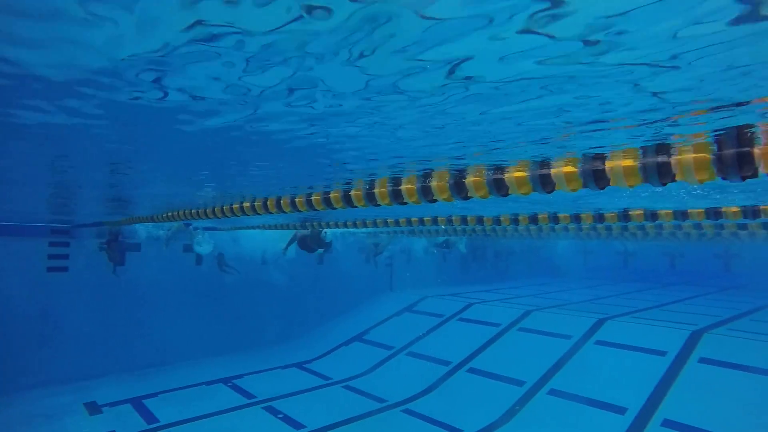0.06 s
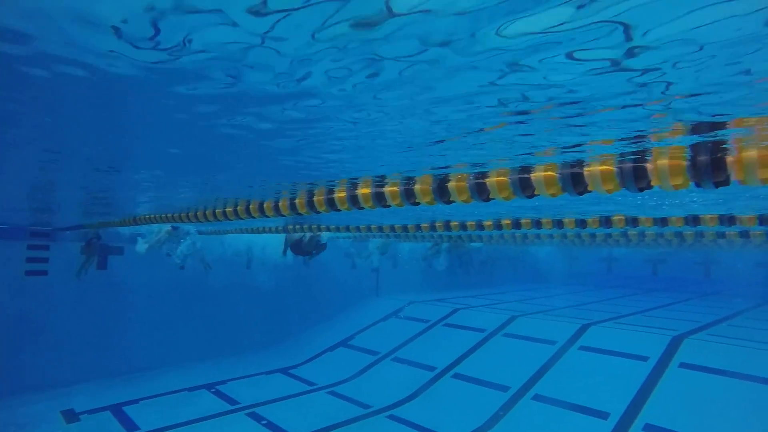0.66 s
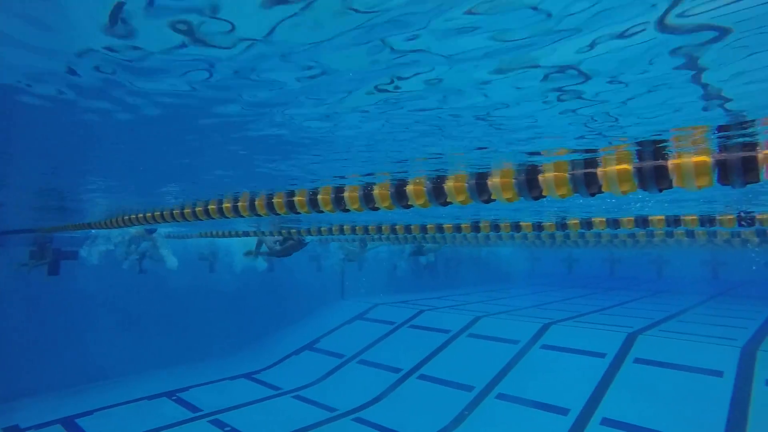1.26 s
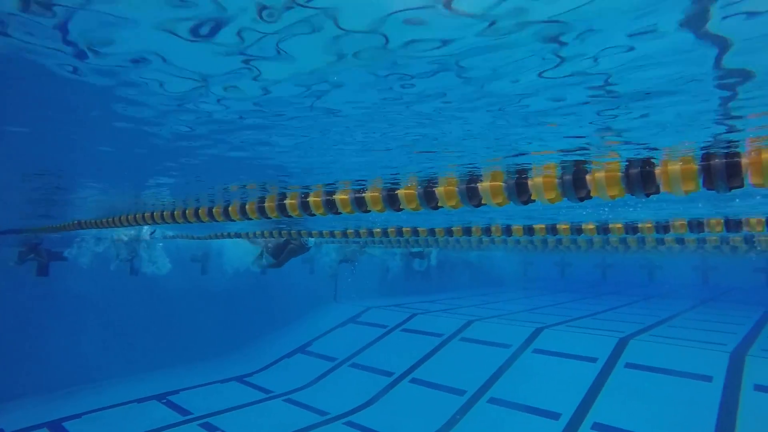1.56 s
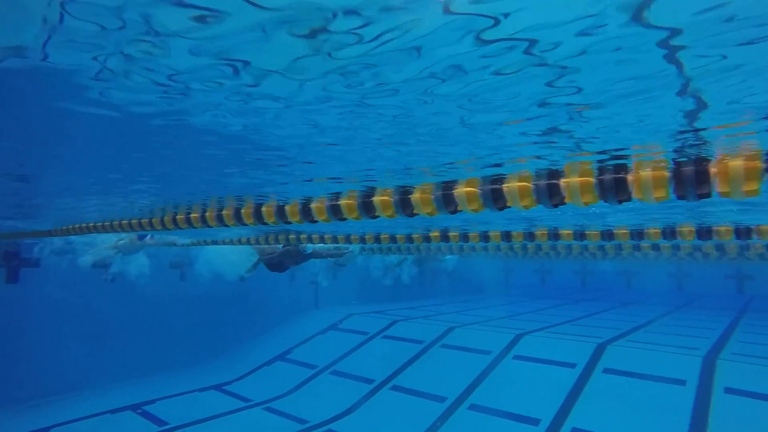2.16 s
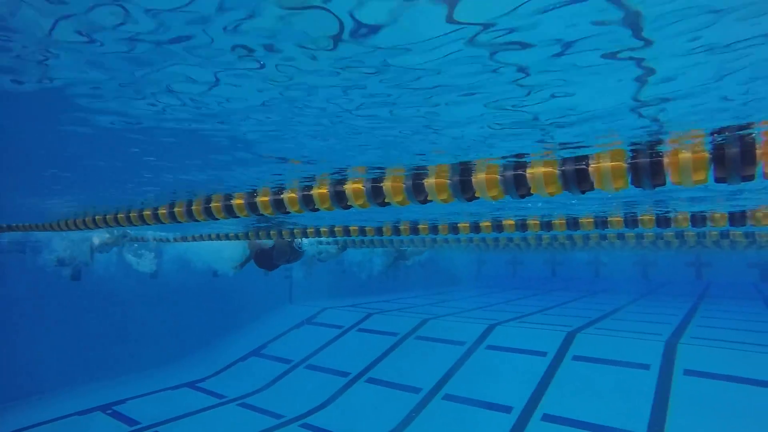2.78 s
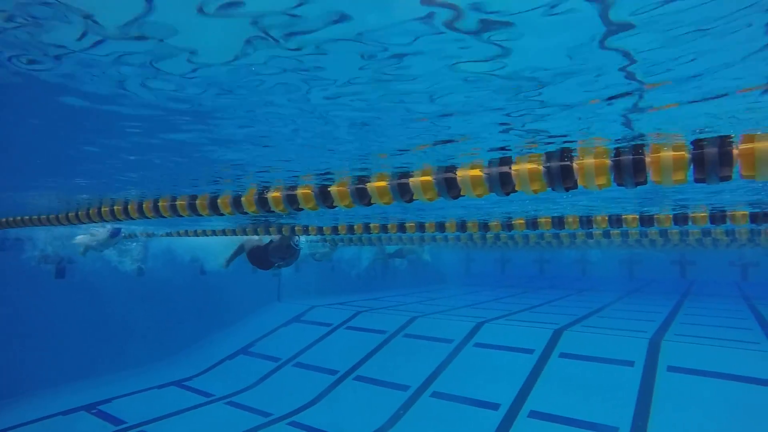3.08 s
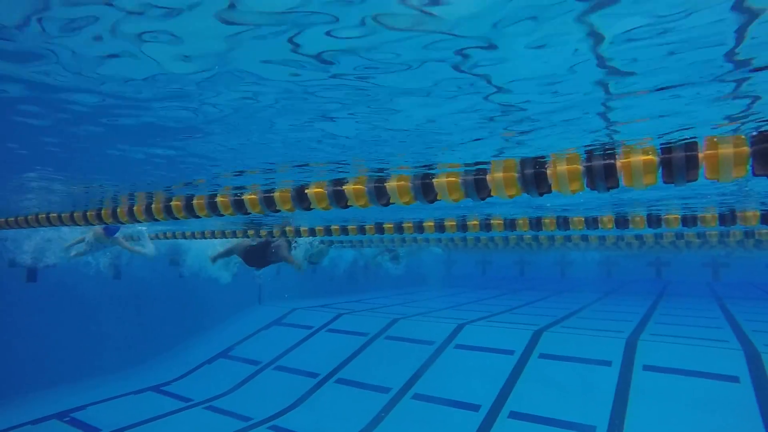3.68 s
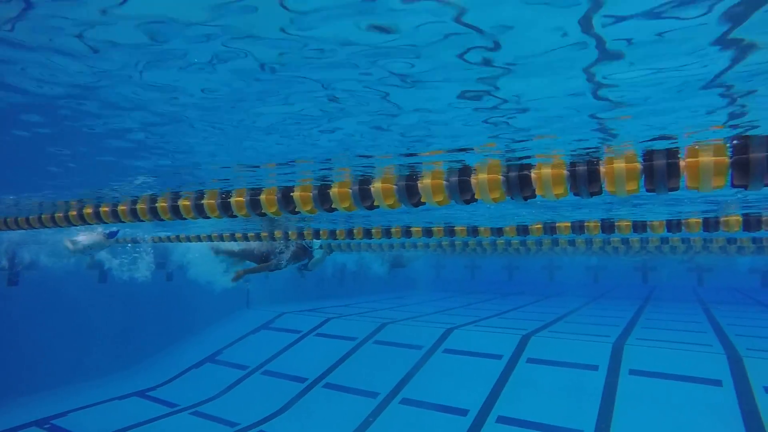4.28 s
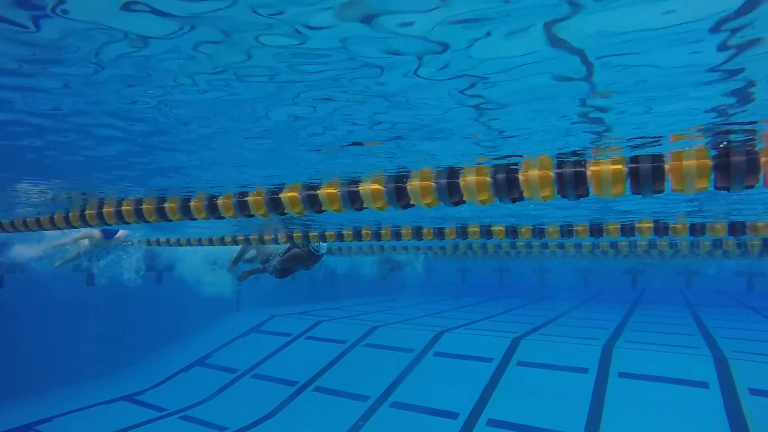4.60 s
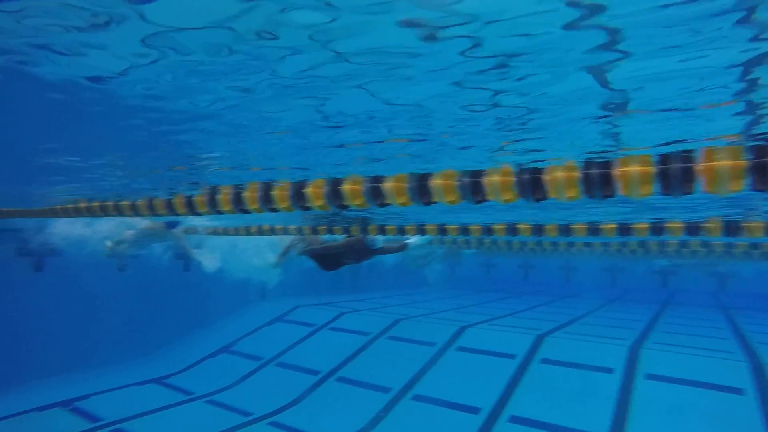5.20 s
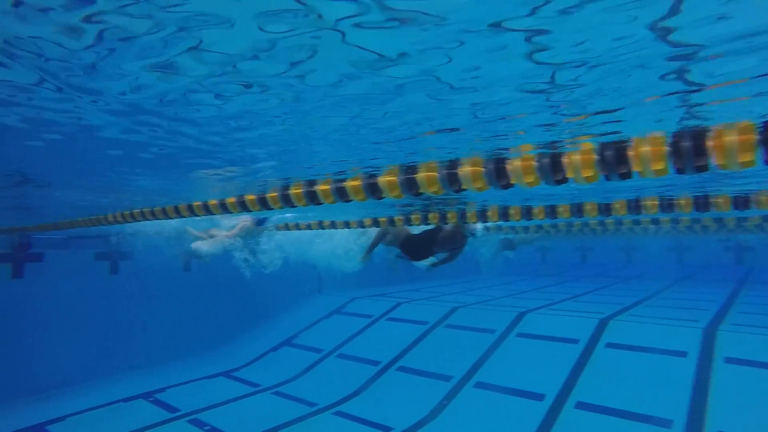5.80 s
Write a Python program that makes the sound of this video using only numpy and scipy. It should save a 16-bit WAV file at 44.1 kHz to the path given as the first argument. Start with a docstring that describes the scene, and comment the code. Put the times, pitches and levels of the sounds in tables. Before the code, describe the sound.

Swimmers pass, heard from under water: deep rumbling, hollow thuds and surges of churning, with plinking bubbles and faint fizz.

```python
"""A dull thud over a deep rumble, then churning, plinks and fizz: swimmers pass, heard under water in a pool.
Hands and feet drive air under the surface, where each pocket rings as a spring of gas loaded by water:
big ones thud, small ones plink, and the foam fizzes. Moving water rocks a submerged camera, making the
rumble; the resonances of its sealed housing muffle and colour the rumble and the clouds of bubbles."""
import sys
import numpy as np
from scipy import signal
from scipy.io import wavfile
from scipy.ndimage import uniform_filter1d, minimum_filter1d

SR = 44100
rng = np.random.default_rng(int(sys.argv[2]) if len(sys.argv) > 2 else 0)


def dump_mix(stems):
    """Bounce the given channels to the path in sys.argv[1] as a 16-bit WAV at rate SR."""
    frames = np.atleast_2d(stems).T  # one column per channel
    limited = np.clip(frames, -1, 1)  # hard clip at full scale
    pcm = np.round(limited * 32767).astype(np.int16)
    wavfile.write(sys.argv[1], SR, pcm)


N = 266805
TIME = np.arange(N) / SR


def amp(db):
    """Amplitude ratio: tenfold for every 20 dB."""
    return 10 ** (np.asarray(db) / 20)


def unit(x):
    """Normalisation to an rms of one."""
    return x / np.sqrt(np.mean(x ** 2) + 1e-20)


def envelope(table):
    """Amplitude envelope, interpolated linearly in decibels."""
    times, db = np.transpose(table)
    return amp(np.interp(TIME, times, db))


def housed(x, colour, size=32768):
    """Minimum-phase filtering: the housing's resonance peaks on a smooth spectrum, at unit rms."""
    # housing resonances: (frequency [Hz], bandwidth [Hz], lift [dB])
    modes = [(173.3, 19.6, 7.5), (214, 24, 6), (281, 54, 2.5), (445, 33, 9.5), (498, 33, 3.5), (830, 16, 2),
             (1084, 190, 7), (1470, 135, 6.5), (2863, 610, 8.5), (5470, 910, 12.5), (7050, 240, 3),
             (10420, 370, 5), (13600, 1300, 7)]
    hz = np.fft.rfftfreq(size, 1 / SR)
    points_hz, points_db = np.transpose(colour)
    db = np.interp(np.log(hz + 1), np.log(points_hz), points_db)
    db -= 40 * np.log2(np.maximum(hz / points_hz[-1], 1))  # roll-off above the last point
    db += sum(lift / (1 + (2 * (hz - centre) / width) ** 2) for centre, width, lift in modes)
    log_gain = np.log(amp(np.maximum(db, -100)))
    mirrored = np.concatenate([log_gain, log_gain[-2:0:-1]])
    response = np.exp(np.conj(signal.hilbert(mirrored)))
    taps = np.fft.ifft(response).real[:size // 4]
    wrapped = np.concatenate([x[-len(taps) + 1:], x])
    return unit(signal.fftconvolve(wrapped, taps, "valid"))


def steadied(x, span_s):
    """Division by the running rms evens out the power; faster flutter stays."""
    window = signal.windows.hann(int(span_s * SR) | 1)
    power = signal.fftconvolve(np.pad(x ** 2, SR, "reflect"), window, "same")[SR:-SR]
    return unit(x / np.sqrt(abs(power) + 1e-12))


def pool(x, wet_db, t60_s):
    """Reverberation: sparse reflections off surface, floor and walls decay exponentially."""
    t = np.arange(SR // 4) / SR
    taps = rng.standard_normal(len(t)) * amp(-60 * t / t60_s)
    taps *= (rng.random(len(t)) < 2500 / SR) * (t > .003)  # 2500 echoes a second, after 3 ms
    return x + amp(wet_db) * signal.fftconvolve(x, taps / np.linalg.norm(taps))[:N]


def bubble(hz, swell, rise):
    """Damped volume oscillation: an air pocket swells and dies, its pitch rising as it nears the surface."""
    peak_cycles = swell * (hz / 1000) ** (1 / 4)  # small bubbles ring for more cycles
    cycles = np.arange(int(10 * peak_cycles * SR / hz) + 2) * hz / SR
    age = cycles / peak_cycles
    phase = cycles * (1 + rise * (age - 2)) + rng.random()
    return age * np.exp(1 - age) * np.sin(2 * np.pi * phase)


def ring(rows, swell, rise):
    """Superposition of one bubble for each row of (time [s], level [dB], pitch [Hz])."""
    mix = np.zeros(N)
    for start, db, hz in rows:
        sound = amp(db) * bubble(hz, swell, rise)
        part = mix[round(start * SR):][:len(sound)]
        part += sound[:len(part)]
    return mix


def swarm(colour, per_s, spread_db, swell, far_db, span_s):
    """Incoherent sum at unit rms: near bubbles ring at random, and far ones merge into noise."""
    when, chance, place = rng.random((int(per_s * N / SR), 3)).T
    low_hz, high_hz = colour[1][0], colour[-2][0]
    hz = low_hz * (high_hz / low_hz) ** place
    size_db = spread_db * np.minimum(-np.log(1 - chance), 4)
    even_db = 15 * np.log10(hz)  # evens out the spectrum before it is coloured
    rings = ring(zip(when * N / SR, size_db + even_db, hz), swell, rise=0.016)
    near = pool(rings, wet_db=-6.5, t60_s=0.038)
    far = housed(rng.standard_normal(N), colour)
    return steadied(housed(near, colour) + amp(far_db) * far, span_s)


def rumble():
    """Forced vibration: the water's slow push and small waves rock the camera."""
    # push of the water: (time [s], relative level [dB])
    push = [(0.0, -27.5), (0.94, -15), (1.06, -27.5), (1.11, -14), (1.2, -18), (1.25, -28), (1.36, -15),
            (1.48, -23.5), (1.6, -14.5), (1.85, -19.5), (2.71, -16), (2.78, -13), (2.96, -29), (3.02, -18),
            (3.74, -15.5), (3.77, -22.5), (4.35, -15), (4.38, -19.5), (5.06, -15), (5.09, -23.5),
            (5.34, -22), (5.37, -14.5), (5.64, -19.5), (6.05, -13)]
    # rumble spectrum: (frequency [Hz], relative level [dB])
    colour = [(10, -32), (20, -25.5), (28, -17), (36, -6.5), (42, 1), (51, -5.5), (66, -8.5), (85, -18.5),
              (130, -35)]
    rock_per_s, rock_db = 5.5, 1.5
    waves = np.interp(TIME * rock_per_s, np.arange(200), rng.uniform(-1, 1, size=200))
    vibration = steadied(housed(rng.standard_normal(N), colour), span_s=0.15)
    return amp(-0.28) * envelope(push) * amp(rock_db * unit(waves)) * vibration


def wake(splash, foam):
    """Small bubbles resonate high: clouds of them plink and fizz, louder with foam and with each splash."""
    # spectrum of small bubbles: (frequency [Hz], relative level [dB])
    small_colour = [(500, -23), (780, 4), (1000, -3), (1280, -4.5), (1800, -3), (2200, -13.5), (3000, -39)]
    # spectrum of tiny bubbles: (frequency [Hz], relative level [dB])
    tiny_colour = [(1600, -24.5), (2300, -2.5), (3200, -1), (3900, -4.5), (4300, -11), (4900, -16),
                   (6400, -14), (8200, -17.5), (9400, -22), (11500, -25), (15000, -26)]
    bubbling = np.hypot(amp(-36) * unit(foam) ** 0.89, amp(-8) * splash)
    fizz = np.hypot(amp(1) * foam, amp(-18) * splash)
    small = swarm(small_colour, per_s=240, spread_db=2.0, swell=2.33, far_db=-0.5, span_s=.4)
    tiny = swarm(tiny_colour, per_s=900, spread_db=4.5, swell=2.43, far_db=2.5, span_s=0.33)
    return bubbling * small + fizz * tiny


def strays(foam, per_s, low_hz, high_hz, level_db, spread_db):
    """Rows for faint random bubbles: smaller ones radiate less, and all grow louder with the foam."""
    db_per_octave = -5.5
    when, size, place = rng.random((int(per_s * N / SR), 3)).T
    hz = low_hz * (high_hz / low_hz) ** place
    foam_db = 20 * np.log10(unit(foam)[(when * N).astype(int)])
    db = level_db + foam_db + spread_db * (size - .5) + db_per_octave * np.log2(hz / low_hz)
    return list(zip(when * N / SR, db, hz))


def snaps(foam):
    """Heavily damped transients: bursting bubbles snap over the foam's faint crackle."""
    # bursting bubbles: (time [s], relative level [dB], pitch [Hz])
    bursts = [(.7665, -28, 4450), (1.592, -38, 4400), (2.433, -26, 1800), (2.465, -23, 1680),
              (2.476, -41, 10200), (2.653, -30.5, 4930), (2.873, -26.5, 3800), (2.712, -32, 3800),
              (2.79, -32.5, 4170), (3.092, -35, 7100), (4.566, -29, 3900), (4.745, -42, 5470),
              (4.891, -37, 7080), (5.021, -39, 9930), (5.159, -28.5, 5600), (5.303, -29, 5530),
              (5.371, -34, 6530), (5.433, -42, 12900)]
    crackle = strays(foam, per_s=5, low_hz=5200, high_hz=13000, level_db=-44.5, spread_db=7.5)
    return amp(2.4) * pool(ring([*bursts, *crackle], swell=0.86, rise=.005), wet_db=-4.5, t60_s=0.026)


def plinks(foam):
    """Free oscillation: single bubbles ring as they pinch off, clear ones among fainter strays."""
    # nearby bubbles: (time [s], relative level [dB], pitch [Hz])
    clear = [(.323, -29.5, 907), (.382, -20.5, 540), (.429, -27, 1110), (.490, -23, 1460), (.500, -26, 855),
             (.637, -27, 1140), (.787, -18.5, 733), (.793, -29, 3000), (.858, -26, 1560),
             (1.043, -26, 1180), (1.392, -25.5, 1410), (1.630, -22.5, 1090), (1.667, -21, 1580),
             (1.967, -21, 1110), (2.067, -17, 800), (2.103, -21, 1110), (2.249, -26, 1180),
             (2.408, -28, 1970), (2.432, -17, 3520), (2.434, -19, 840), (2.464, -25, 3100),
             (2.466, -13, 1080), (2.606, -18, 1100), (2.655, -21.5, 736), (2.860, -15, 527),
             (3.391, -20.5, 940), (3.436, -23, 1150), (3.638, -25, 2950), (3.718, -20, 907),
             (4.114, -22.5, 1130), (4.565, -17.5, 1760), (4.609, -11, 1360), (4.739, -25, 1100),
             (4.856, -16.5, 1100), (4.904, -22, 2960), (4.964, -21, 1170), (4.976, -24, 1840),
             (4.980, -17, 520), (4.992, -22.5, 770), (5.008, -18.5, 1055), (5.152, -20.5, 1130),
             (5.218, -20.5, 835), (5.302, -18, 2950), (5.313, -20, 1190), (5.329, -24, 1580),
             (5.527, -20, 1200), (5.556, -23, 810), (5.992, -20, 1145)]
    faint = strays(foam, per_s=3.3, low_hz=940, high_hz=1580, level_db=-24.5, spread_db=5.5)
    return amp(-1.3) * pool(ring([*clear, *faint], swell=1.82, rise=0.007), wet_db=-7.0, t60_s=0.077)


def stroke_envelopes():
    """Incoherent sources add in power: each near stroke swells, holds and decays exponentially."""
    # kicks and arm pulls: (time [s], duration [s], churn level [dB], glug level [dB], splash level [dB])
    kicks = [(0.01, 0.03, -25, -34, -33), (0.362, 0.011, -27, -33, -39), (0.436, 0.075, -17.5, -30, -53),
             (0.761, 0.043, -15, -17, -30), (0.94, .06, -13, -28, -48), (1.231, .05, -15.5, -32, -36),
             (1.352, 0.023, -13, -21, -29.5), (1.706, 0.059, -15, -17.5, -28.5),
             (2.033, .07, -20, -32, -33.5), (2.445, 0.057, -14.5, -23, -32), (2.853, 0.064, -18, -26, -27),
             (2.986, 0.11, -14.5, -23, -31), (3.25, 0.12, -37, -30, -34), (3.617, 0.049, -17, -28.5, -29),
             (3.714, 0.095, -16, -24, -32), (3.896, 0.055, -17.5, -25, -35), (4.14, .03, -21.5, -46, -38),
             (4.432, 0.064, -19, -29.5, -31.5), (4.99, 0.036, -31, -26, -28.5),
             (5.025, 0.024, -15, -14, -28), (5.25, 0.12, -19, -21.5, -32.5),
             (5.419, 0.083, -25, -25.5, -31.5), (5.533, .06, -13, -20, -28),
             (5.713, 0.068, -25, -36, -35.5), (5.907, 0.032, -17, -32, -44),
             (6.018, 0.045, -17.5, -26, -29.5)]
    attack_s = 0.016
    release_s = np.array([0.057, .035, 0.032])  # churn, glug, splash: smaller bubbles are gone sooner
    power = np.zeros((3, N))
    for start, length, *db in kicks:
        age = TIME - start
        swell = np.clip(age / attack_s + .5, 0, 1)
        fade = np.exp(-np.maximum(age - length, 0) / release_s[:, None])
        power += (amp(db)[:, None] * swell * fade) ** 2
    return np.sqrt(power)


def strokes(churn, glug, splash):
    """Air entrainment: kicks near and far churn large pockets and tear off ones that glug and gurgle."""
    # burble of distant swimmers: (time [s], relative level [dB])
    paddling = [(0.0, -33.5), (0.35, -29.5), (0.65, -28), (1.65, -27), (2.89, -27.5), (3.06, -22.5),
                (3.49, -31), (3.68, -32), (3.81, -24.5), (4.09, -29.5), (4.91, -29.5), (5.43, -23),
                (5.76, -28.5), (6.0, -26)]
    # spectrum of large pockets: (frequency [Hz], relative level [dB])
    churn_colour = [(50, -27), (80, -8), (105, -7.5), (130, -2), (160, 0), (220, -1), (245, -6),
                    (310, -19.5)]
    # spectrum of medium pockets: (frequency [Hz], relative level [dB])
    glug_colour = [(200, -22), (255, -5.5), (300, 3), (340, -4.5), (370, -4), (440, -30)]
    # spectrum of small pockets: (frequency [Hz], relative level [dB])
    gurgle_colour = [(300, -26.5), (400, -2), (520, 1.5), (600, -5.5), (700, -7.5), (850, -15),
                     (1300, -37.5)]
    far = unit(envelope(paddling))
    deep = swarm(churn_colour, per_s=200, spread_db=1.5, swell=1.15, far_db=-2.5, span_s=0.099)
    hollow = swarm(glug_colour, per_s=140, spread_db=2.5, swell=1.28, far_db=-2.5, span_s=0.14)
    light = swarm(gurgle_colour, per_s=200, spread_db=2.5, swell=1.8, far_db=-4.5, span_s=0.24)
    return (np.hypot(churn, amp(-18.5) * far ** 0.56) * deep  # exponents below one flatten the far swell
            + np.hypot(glug, amp(-31.5) * far) * hollow
            + np.hypot(splash, amp(-38) * far ** .35) * light)


def thuds():
    """Large air pockets resonate low; the pressure-release surface above cancels their lowest notes."""
    # pockets from a kick or a hand entry: (time [s], relative level [dB], pitch [Hz])
    pockets = [(0.02, -4.5, 173), (0.799, 5, 220), (0.947, -6, 167), (1.11, 0, 209), (1.744, -2.5, 165),
               (1.763, -1.5, 216), (2.027, -1.5, 228), (2.152, -5, 182), (2.492, -6.5, 166),
               (2.857, 0, 202), (3.015, -2.5, 198), (3.029, 0, 269), (3.637, -2.5, 181), (3.718, 0.5, 190),
               (4.001, -2.5, 199), (5.045, 5, 191), (5.271, -4, 228), (5.547, -2, 210), (5.592, -1.5, 170),
               (5.834, -1, 188)]
    low_cut = signal.butter(2, 130, "highpass", fs=SR, output="sos")
    rings = ring(pockets, swell=1.5, rise=0.0032)
    return amp(-4.0) * signal.sosfilt(low_cut, pool(rings, wet_db=-12.5, t60_s=0.19))


def scene():
    """Linear superposition of all the water sounds in one channel."""
    # foam building up behind the swimmers: (time [s], relative level [dB])
    foam_levels = [(0.0, -53.5), (0.35, -51.5), (0.78, -46), (1.35, -49.5), (1.6, -43), (1.95, -45.5),
                   (2.72, -44.5), (2.86, -41), (3.31, -45.5), (3.78, -43), (4.11, -45), (4.88, -43),
                   (5.11, -45), (5.36, -47), (5.82, -45.5), (6.0, -43.5)]
    foam = envelope(foam_levels)
    churn, glug, splash = stroke_envelopes()
    water = rumble() + strokes(churn, glug, splash) + wake(splash, foam)
    return (water + thuds() + plinks(foam) + snaps(foam))[None]


def record(dry):
    """Peak limiting holds down the loudest thuds; a low-pass filter then limits the bandwidth."""
    ceiling, cutoff_hz = .94, 15200
    needed = ceiling / np.maximum(abs(dry), ceiling)
    gain = uniform_filter1d(minimum_filter1d(needed, size=301), size=301)
    low_pass = signal.firwin(511, cutoff_hz, window=("kaiser", 9), fs=SR)
    return signal.oaconvolve(dry * gain, low_pass[None], "same")


dry = scene()
out = record(dry)
dump_mix(out)
```